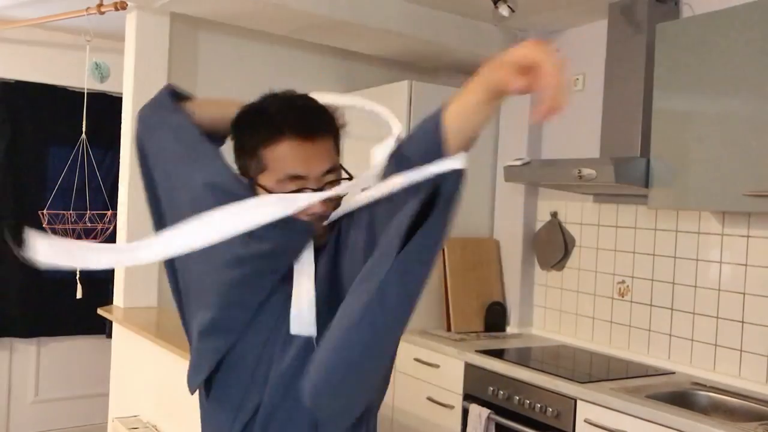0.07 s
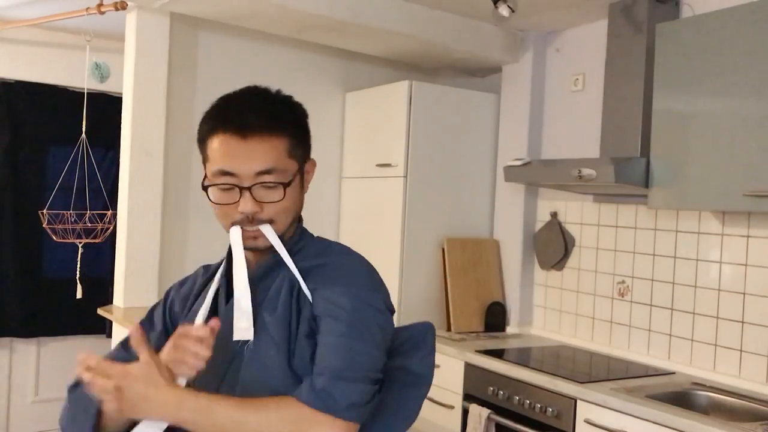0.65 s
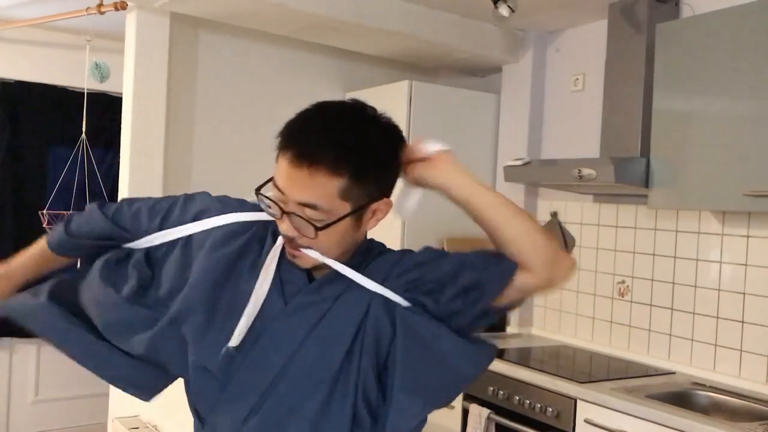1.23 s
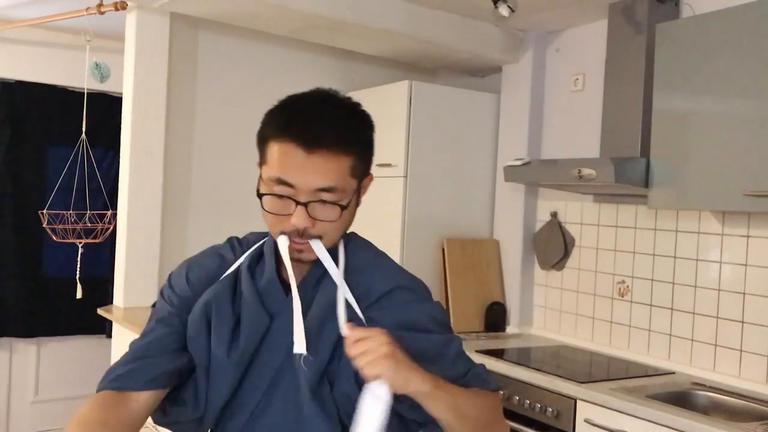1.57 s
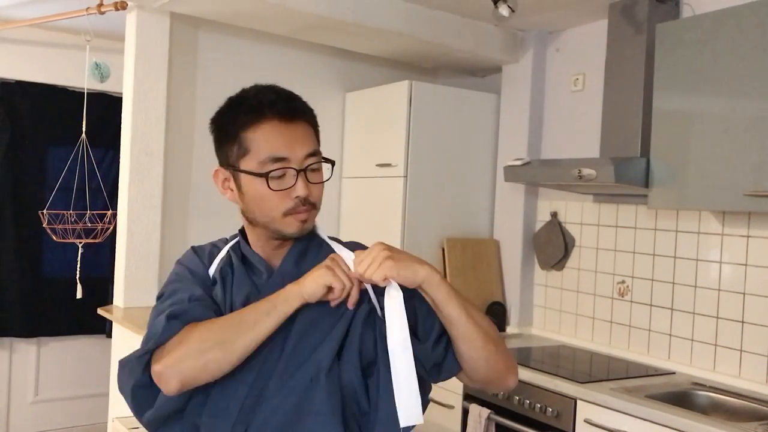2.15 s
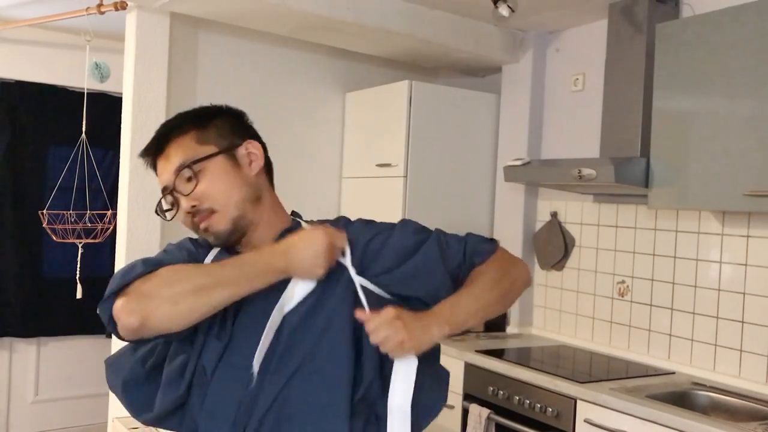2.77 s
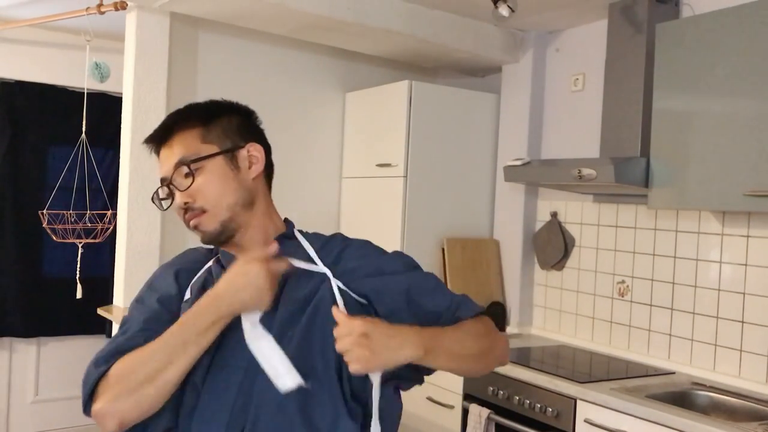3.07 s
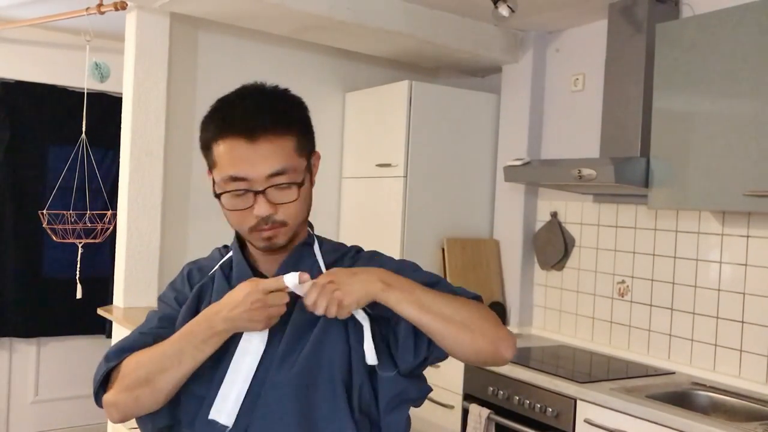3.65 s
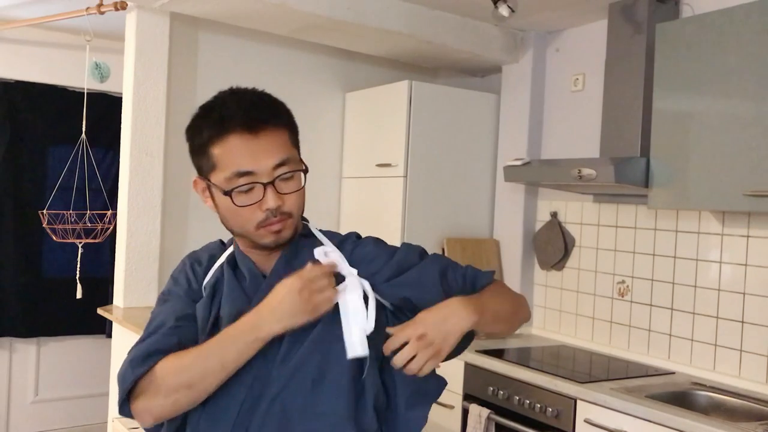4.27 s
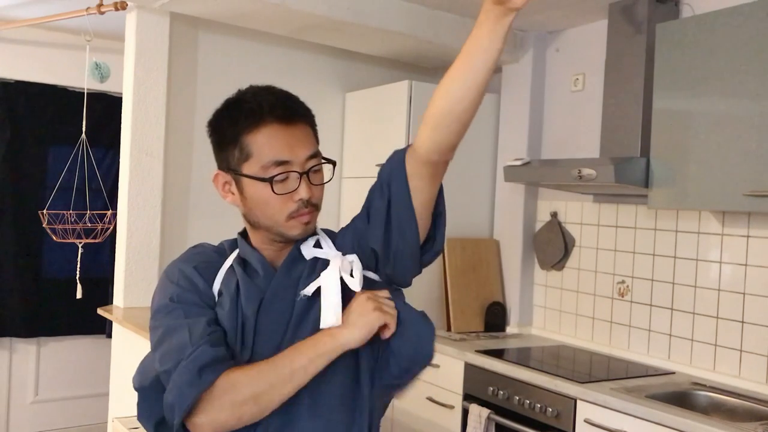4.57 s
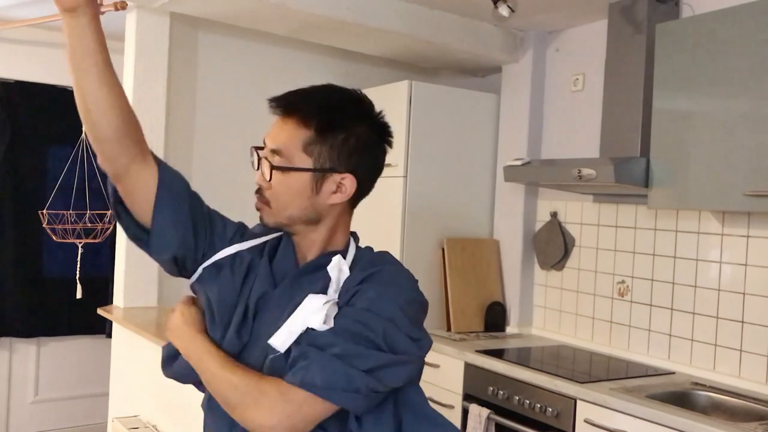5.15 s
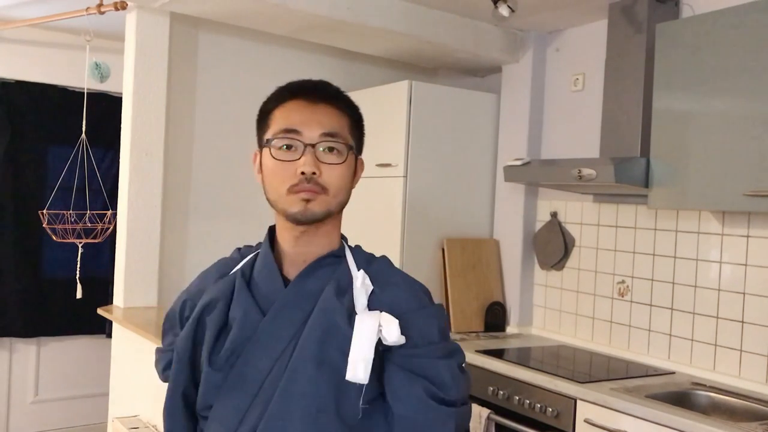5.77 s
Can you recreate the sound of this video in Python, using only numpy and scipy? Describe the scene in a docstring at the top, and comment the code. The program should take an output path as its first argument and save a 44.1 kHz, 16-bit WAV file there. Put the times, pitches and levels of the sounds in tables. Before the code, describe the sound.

Cotton rustles and a flat cord hisses over it in a hard-walled kitchen, heard through one microphone over a faint, steady appliance hum. A swish builds from the start to the loudest, sharp snap at 0.4 seconds, with low puffs from flapping sleeves there and at 0.7. Rubbing strokes swell again from 1 to 1.7 seconds, with small snaps, then soften. A sharp crack of cloth pulling taut comes at about 2.5 seconds, and a cluster of smaller snaps with rustling near 3, each briefly echoed by the room. Quieter sliding and rubbing follow as the cord is tied, with a light swish at 4.1 and a brisk sleeve rustle at 4.8. A final flurry brings crisp snaps at about 5.4 and 5.5 seconds. The rustle cuts off abruptly just before 5.6, leaving a soft even hiss over the hum.

```python
"""A flat cord slides over cotton: wide sleeves are tied back in a hard-walled kitchen, one microphone.
Stick-slip friction makes the cloth rustle and the cord hiss. Folds snap taut and the room answers;
flapping sleeves push low puffs of air. An appliance hums at the mains frequency throughout.
The last rustle cuts off abruptly, leaving a soft hiss over the hum."""
import sys
import numpy as np
from scipy import signal
from scipy.fft import rfft, irfft, next_fast_len
from scipy.io import wavfile
from scipy.ndimage import map_coordinates

SR = 44100
rng = np.random.default_rng(int(sys.argv[2]) if len(sys.argv) > 2 else 0)


def dump(signal):
    """Clip the signal to [-1, 1] and save it as 16-bit WAV at the path in sys.argv[1]."""
    limited = np.clip(np.atleast_2d(signal).T, -1, 1)
    pcm = np.round(limited * 32767).astype(np.int16)
    wavfile.write(sys.argv[1], SR, pcm)


N = 256476
TIME = np.arange(N) / SR
STOP_S = 5.563
LOW_CUT_HZ, TOP_HZ = 30, 15850
SWELL_POWER, SNAP_CYCLES = 1.27, 1.23
RUB_FALL_DB_PER_S, FOLDS_FALL_DB_PER_S, CORD_FALL_DB_PER_S = 117, 126, 161

# appliance partials (frequency [Hz], rms level [dB])
HUM_PARTIALS = [(49.6, -66.5), (98.2, -55), (147.5, -74), (246.6, -68), (397, -74.5), (445, -78.5),
                (592, -73.5)]
# room air, room rumble, closing hiss: spectra (frequency [Hz], relative density [dB])
AIR_SPECTRUM = [(100, -34), (170, 0.5), (320, -2.5), (500, -1), (800, -4.5), (1500, -7), (3000, -12),
                (6000, -15.5), (15000, -19)]
RUMBLE_SPECTRUM = [(20, -30), (35, -15), (50, -1.5), (110, -7.5), (200, -20), (600, -50)]
HISS_SPECTRUM = [(100, -18), (250, -9.0), (1000, -0.5), (3000, -5), (7000, -11.5), (15000, -14)]
# kitchen decay (frequency [Hz], T60 [s])
KITCHEN_T60 = [(100, 0.95), (300, 0.79), (1500, 0.99), (5000, 0.59), (13000, 0.79)]
# sleeve flaps (time [s], rms level at crest [dB], swell [s], upper edge [Hz])
SLEEVE_FLAPS = [(.345, -43, 0.0064, 400), (0.387, -33.5, 0.021, 470), (0.696, -39, 0.012, 304),
                (1.405, -46, 0.029, 252), (2.455, -48, 0.019, 450), (2.932, -43, 0.012, 400),
                (4.77, -49.5, 0.026, 400), (5.37, -51.5, 0.031, 260)]
# cloth and cord snapping taut (time [s], level [dB], pitch [Hz], echo [dB re crack])
TAUT_SNAPS = [(.199, -34, 415, -5), (.387, -10.5, 4400, -2.5), (.3885, -32.5, 430, 6),
              (.4483, -27, 3880, 6), (1.414, -41, 1210, 9), (1.52, -31, 400, 0), (2.118, -40.5, 480, 0.5),
              (2.455, -13.5, 1670, -13), (2.4664, -29, 430, -8), (2.4718, -22, 720, -4.5),
              (2.935, -33, 396, -8), (2.937, -29.5, 1820, 4), (2.989, -25, 2420, 8),
              (5.406, -18.5, 2180, -7), (5.5422, -19, 1740, -1)]
# strokes over the cloth (time [s], swell [s], hold [s], rub level [dB], rub centre [Hz],
# folds before trim [dB re rub], cord before trim [dB re rub])
# cord drawn out 0.1 s, thrown over the shoulder 1 s, pulled tight 2.4 s, tied 3 s; arms swing 4.6 s
CLOTH_STROKES = [ (0.0, 0.0033, 0.096, -58, 1750, -2, -2.5), (0.078, 0.041, 0.054, -50.5, 2250, -5, 1.5),
                 (0.179, 0.019, 0.1, -46, 2280, -5.5, -1), (0.29, 0.098, 0.065, -37, 2680, -8.5, -2),
                 (0.528, 0.095, 0.12, -51.5, 1550, -2.5, -0.5), (.74, 0.054, 0.047, -58, 1700, -7, -1),
                 (0.855, 0.12, 0.083, -56, 1390, -6, -4), (1.019, .005, 0.16, -46.5, 1460, -8, -1.5),
                 (1.171, 0.11, 0.27, -45, 1710, -8.5, -2.5), (1.395, 0.02, 0.063, -41, 1500, -4, -3),
                 (1.405, 0.054, .015, -39, 2200, -4, -1.5), (1.49, 0.053, 0.066, -41, 1240, -3, -11),
                 (1.573, 0.043, 0.063, -44, 1360, -6.5, -3.5), (1.72, 0.092, 0.2, -59.5, 1500, -6, 0),
                 (1.928, 0.12, 0.071, -53, 1300, -3, -3), (2.186, .006, 0.035, -54, 1450, -8.5, -2.5),
                 (2.382, 0.014, .004, -51, 1910, -12, -5), (2.392, 0.017, .015, -51.5, 1800, -1, 6.5),
                 (2.443, 0.011, 0.0059, -34, 1340, 1.5, -8.5), (2.72, .15, .02, -55, 1400, -7, -2),
                 (2.868, 0.055, .01, -48.5, 1900, -9, 0.5), (2.921, 0.02, 0.031, -38.5, 1850, -10.5, -1.5),
                 (2.954, 0.026, 0.0072, -45, 2170, -5, -8), (2.998, 0.085, 0.29, -53.5, 1380, -5, -3.5),
                 (3.378, .12, 0.11, -60, 1180, -2.5, -3), (4.121, 0.05, 0.04, -47.5, 2850, -10, 0),
                 (4.263, 0.17, 0.19, -57, 1630, -2, -2), (4.622, 0.044, 0.096, -51.5, 1300, -2, -2),
                 (4.761, .017, 0.019, -35.5, 1760, -2, -2), (4.93, .08, 0.37, -59.5, 1580, -1, -2),
                 (5.208, .014, 0.065, -50, 1100, 0.5, -6), (5.312, 0.093, .004, -34.5, 1440, -7.5, -5.5),
                 (5.43, .045, .02, -45.5, 1400, -6, -9), (5.497, 0.043, 0.0037, -37, 1520, -4.5, -9), ]
# hollow tone of a sleeve swinging open (time [s], centre band lift [dB])
HOLLOW_LIFT = [(1.5, 0.5), (1.58, 6), (1.72, 2), (1.9, 4), (2.9, -2.5), (3, 1), (3.1, 2.5), (5.1, -0.5),
               (5.25, 1.5), (5.45, 5), (5.56, 2)]
# air puff, rubbing cloth, loose folds, cord: spectra (frequency [Hz], relative density [dB])
PUFF_SPECTRUM = [(25, -35), (45, 9), (80, 4.5), (150, 0), (260, -1.5), (450, 2.5)]
RUB_SPECTRUM = [(350, -31), (700, -2), (1000, 1), (1600, -1), (2400, -1.5), (4000, -3), (6000, -7.5),
                (8500, -14), (14000, -43)]
FOLDS_SPECTRUM = [(70, -55), (130, -8), (250, 1.5), (400, 2), (700, 0), (1000, -12), (2000, -25)]
CORD_SPECTRUM = [(2500, -21.5), (4500, -3.5), (6500, -1), (9000, -0.5), (12500, 0), (15500, -1.5)]
# microphone dips (frequency [Hz], width [Hz], gain [dB])
MIC_DIPS = [(4910, 250, -3), (7680, 360, -3.5), (10500, 450, -3.5)]


def amp(db):
    """Decibels to gain."""
    return 10 ** (np.asarray(db) / 20)


def unit(x):
    """Scale to rms 1."""
    return x / np.sqrt(np.mean(x ** 2) + 1e-20)


def along(points, hz):
    """Interpolate (frequency [Hz], value) points on a log axis."""
    knots_hz, values = np.transpose(points)
    return np.interp(np.log(hz + 1), np.log(knots_hz), values)


def wobble(knots_per_s):
    """Smooth random curve."""
    knots = rng.standard_normal(int(N * knots_per_s / SR) + 4)
    return map_coordinates(knots, [TIME * knots_per_s])


def filtered(x, response):
    """Zero-phase filter with gain response(hz)."""
    size = next_fast_len(N + 8192)
    return irfft(rfft(x, size) * response(np.fft.rfftfreq(size, 1 / SR)), size)[:N]


def coloured(x, spectrum):
    """Shape x by a spectrum, at rms 1."""
    return unit(filtered(x, lambda hz: amp(along(spectrum, hz))))


def room_air():
    """Steady quiet air and low rumble."""
    air = amp(-60) * coloured(rng.standard_normal(N), AIR_SPECTRUM)
    rumble = amp(-61.5) * coloured(rng.standard_normal(N), RUMBLE_SPECTRUM)
    return air + rumble


def appliance_hum():
    """Mains hum; each partial wavers in level and phase."""
    hum = np.zeros(N)
    for hz, db in HUM_PARTIALS:
        peak = np.sqrt(2) * amp(db + 1.4 * wobble(2.93))
        hum += peak * np.sin(2 * np.pi * hz * TIME + 1.12 * wobble(4.4))
    return hum


def closing_hiss():
    """Soft even hiss after the rustle cuts off abruptly."""
    return amp(-54) * coloured(rng.standard_normal(N), HISS_SPECTRUM)


def room_tail(early_db, early_t60_s):
    """Diffuse impulse response of energy 1: fast decay off near walls plus the kitchen's longer one."""
    hz, t, noise = signal.stft(rng.standard_normal(SR // 2), SR, nperseg=256)
    late = amp(-60 * t / along(KITCHEN_T60, hz)[:, None])
    early = amp(early_db - 60 * t / early_t60_s)
    tail = signal.istft(noise * (late + early), SR, nperseg=256)[1]
    return tail / np.linalg.norm(tail)


def near_walls(x):
    """Quick reflections off tiles, worktop and ceiling comb the sound."""
    delays_s = rng.uniform(.002, .022, size=8)
    signs = rng.choice([-1, 1], size=8)
    echoes = sum(sign * np.roll(x, round(delay_s * SR)) for delay_s, sign in zip(delays_s, signs))
    return x + amp(-21) * echoes


def flaps():
    """A swinging sleeve pushes a soft low puff of air."""
    out = np.zeros(N)
    for start_s, db, swell_s, edge_hz in SLEEVE_FLAPS:
        age = np.maximum(TIME - start_s, 0) / swell_s
        noise = rng.standard_normal(N)
        puff = filtered(noise, lambda hz: amp(along(PUFF_SPECTRUM, hz)) / (1 + (hz / edge_hz) ** 6))
        out += amp(db) * age * np.exp(1 - age) * unit(puff)
    return out


def snaps():
    """A fold pulled taut cracks for a cycle or two with a spit of slipping fibres; the room answers."""
    out = np.zeros(N + SR)
    t = np.arange(SR // 20) / SR
    for start_s, db, hz, echo_db in TAUT_SNAPS:
        age = 3 * hz * t / SNAP_CYCLES
        spit = amp(-21.5) * rng.standard_normal(len(t))
        crack = amp(db) * age * np.exp(1 - age) * (np.sin(2 * np.pi * hz * t) + spit)
        echo = amp(echo_db) * signal.fftconvolve(crack, room_tail(early_db=1.0, early_t60_s=0.11))
        onset = round(start_s * SR)
        out[onset:onset + len(crack)] += crack
        out[onset:onset + len(echo)] += echo
    return out[:N]


def friction(slips_per_s, slip_share):
    """Uneven stick-slips over the smooth hiss of many fibres, mixed by power."""
    slips = (rng.random(N) < slips_per_s / SR) * rng.standard_normal(N)
    return np.sqrt(slip_share) * unit(slips) + np.sqrt(1 - slip_share) * rng.standard_normal(N)


def stroke_curves():
    """Strokes swell, hold and die away, cord hiss first; overlaps add in power."""
    rub, folds, cord, weighted_hz = np.zeros((4, N))
    for start_s, swell_s, hold_s, db, centre_hz, folds_db, cord_db in CLOTH_STROKES:
        level = amp(db) * np.clip((TIME - start_s) / swell_s, 1e-4, 1) ** SWELL_POWER
        released_s = np.maximum(TIME - start_s - swell_s - hold_s, 0)
        power = (level * amp(-RUB_FALL_DB_PER_S * released_s)) ** 2
        rub += power
        weighted_hz += power * centre_hz
        folds += (level * amp(folds_db - FOLDS_FALL_DB_PER_S * released_s)) ** 2
        cord += (level * amp(cord_db - CORD_FALL_DB_PER_S * released_s)) ** 2
    return 10 * np.log10(rub), weighted_hz / rub, 10 * np.log10(folds / rub), 10 * np.log10(cord / rub)


def focused(x, centre_hz, width_oct, tilt_db_per_oct2):
    """Lift a band around a moving centre and tilt the spectrum with it, at steady power."""
    hz, t, bins = signal.stft(x, SR, nperseg=256)
    pitch_oct = np.log2(np.maximum(hz[:, None], 300) / 1700)
    centre_oct = np.log2(np.interp(t, TIME, centre_hz) / 1700)
    lift_db = np.interp(t, *np.transpose(HOLLOW_LIFT))
    band = np.exp(-((pitch_oct - centre_oct) / width_oct) ** 2)
    gain = amp(lift_db * band + tilt_db_per_oct2 * centre_oct * pitch_oct)
    power = np.mean(np.abs(bins) ** 2, axis=1, keepdims=True)
    gain /= np.sqrt(np.sum(power * gain ** 2, axis=0))
    return unit(signal.istft(bins * gain, SR, nperseg=256)[1][:N])


def rustle():
    """Cloth rubs on cloth, each stroke at its own pitch; folds murmur below, the cord hisses above."""
    rub_db, centre_hz, folds_db, cord_db = stroke_curves()
    grip_db = rub_db + 0.34 * wobble(45)  # contact catches and lets go
    fibres = near_walls(friction(slips_per_s=1600, slip_share=0.26))
    creases = near_walls(friction(slips_per_s=200, slip_share=0.24))
    weave = near_walls(friction(slips_per_s=2000, slip_share=0.3))
    rub = focused(coloured(fibres, RUB_SPECTRUM), centre_hz, width_oct=0.25, tilt_db_per_oct2=3.5)
    folds = amp(folds_db - 2.5) * coloured(creases, FOLDS_SPECTRUM)
    cord = amp(cord_db + 0.5) * coloured(weave, CORD_SPECTRUM)
    return amp(grip_db) * (rub + folds + cord)


def scene():
    """Cloth sound, cut at STOP_S, over the steady room; both channels alike."""
    cloth = rustle() + snaps() + flaps()
    mono = np.where(TIME < STOP_S, cloth, closing_hiss()) + appliance_hum() + room_air()
    return np.array([mono, mono])


def record(dry):
    """Microphone: low cut, narrow treble dips, steep band limit."""
    def response(hz):
        low_cut = hz ** 4 / (hz ** 4 + LOW_CUT_HZ ** 4)
        dips_db = sum(db * np.exp(-((hz - dip_hz) / width_hz) ** 2) for dip_hz, width_hz, db in MIC_DIPS)
        return low_cut * amp(dips_db) * (hz < TOP_HZ)

    return np.array([filtered(channel, response) for channel in dry])


dry = scene()
out = record(dry)
dump(out)
```